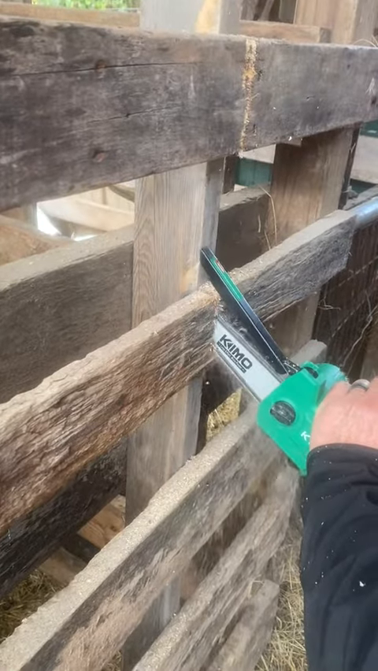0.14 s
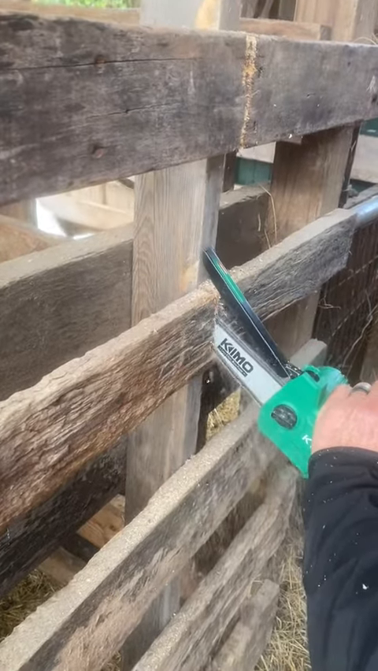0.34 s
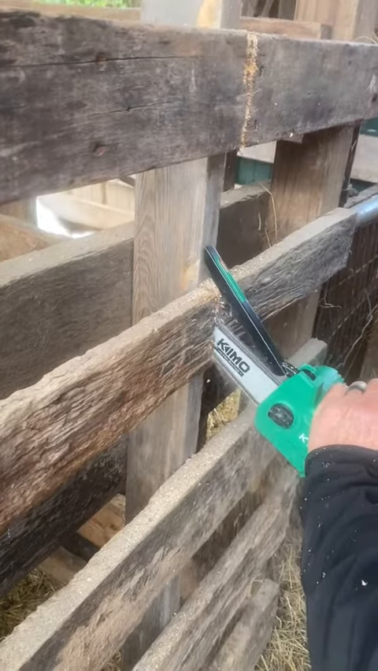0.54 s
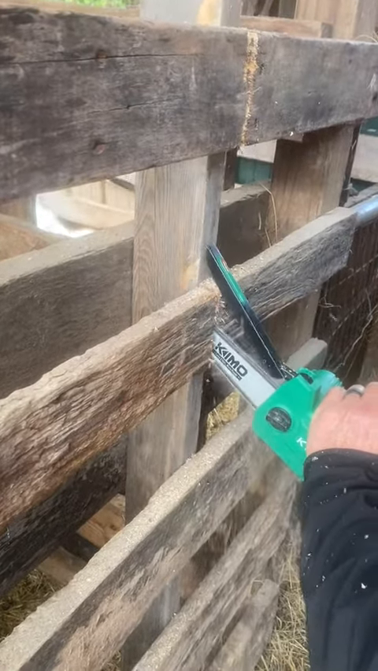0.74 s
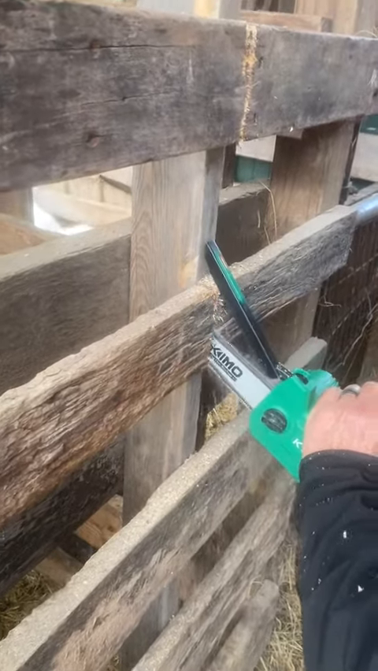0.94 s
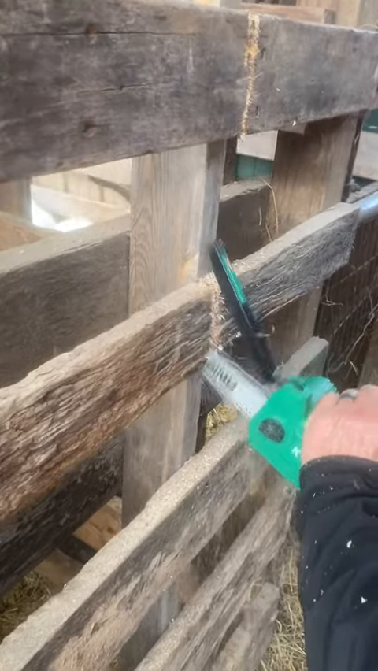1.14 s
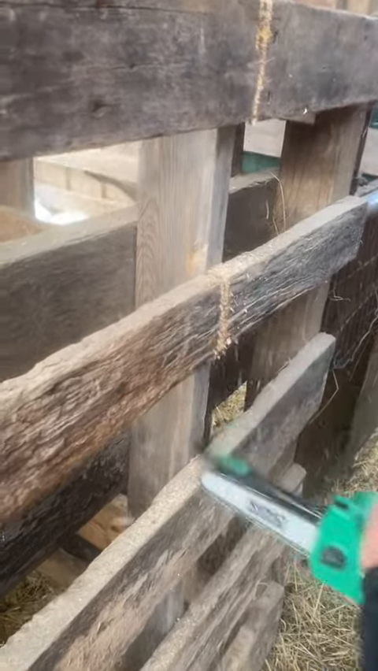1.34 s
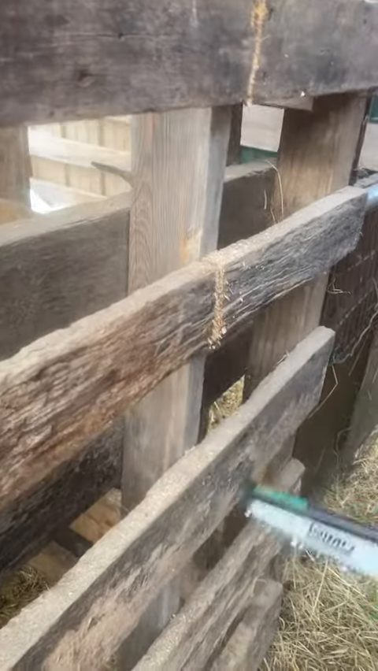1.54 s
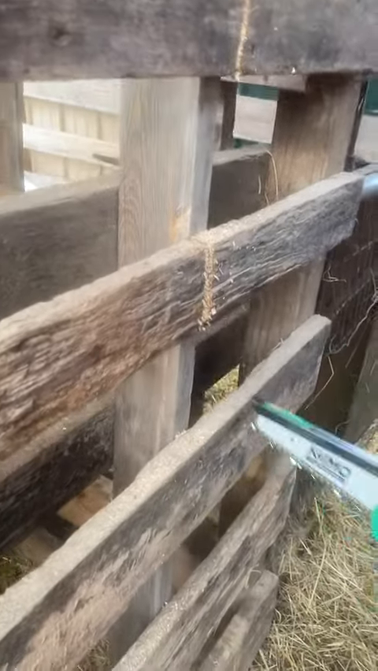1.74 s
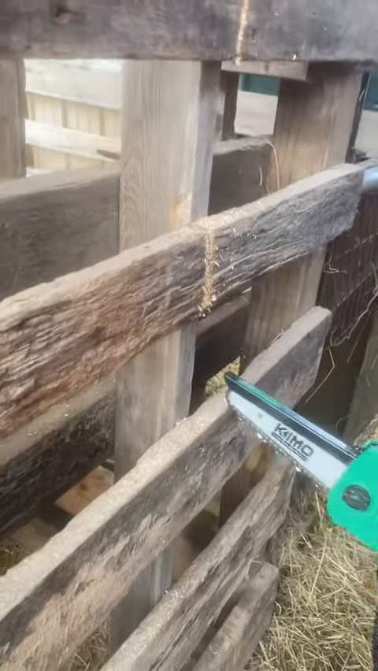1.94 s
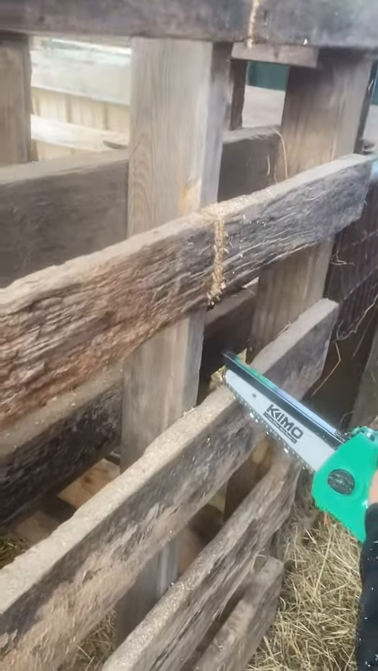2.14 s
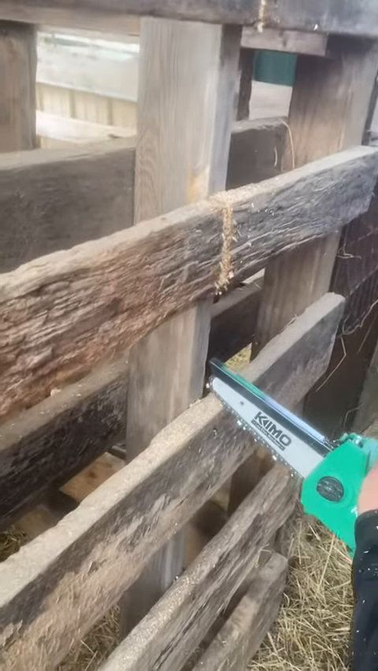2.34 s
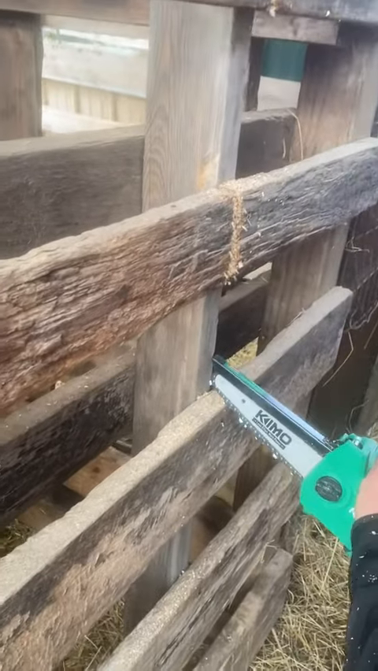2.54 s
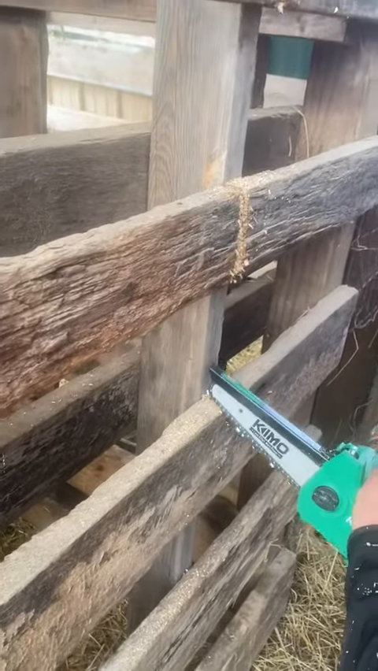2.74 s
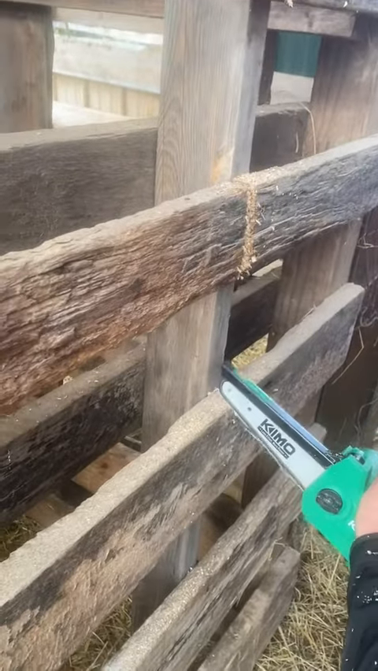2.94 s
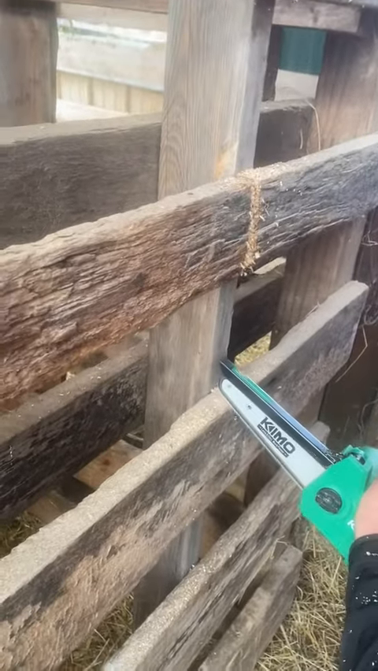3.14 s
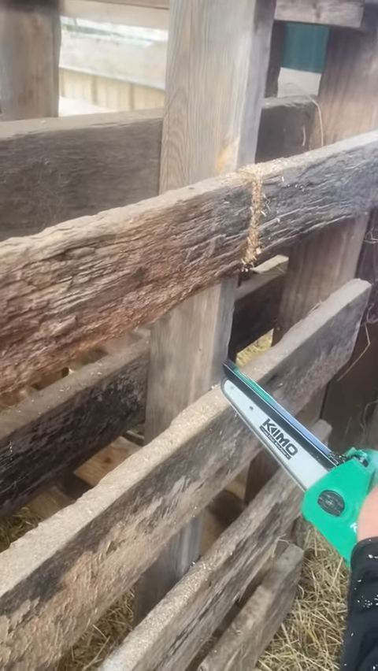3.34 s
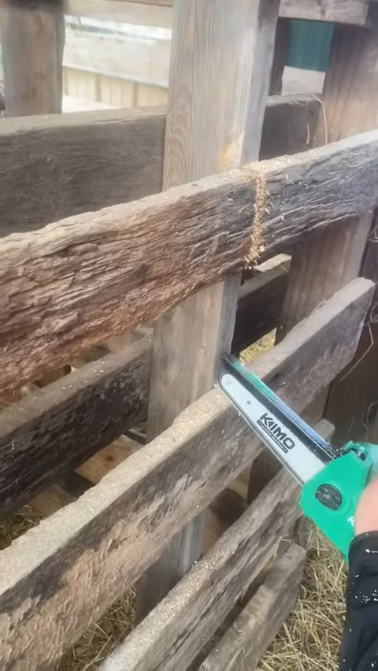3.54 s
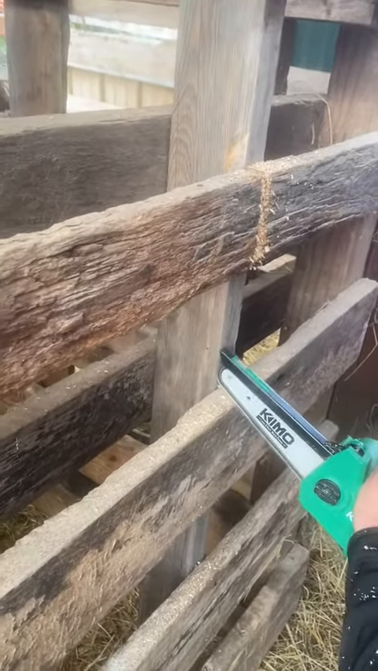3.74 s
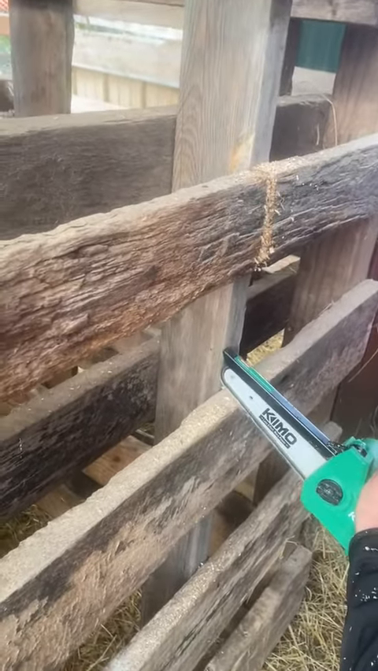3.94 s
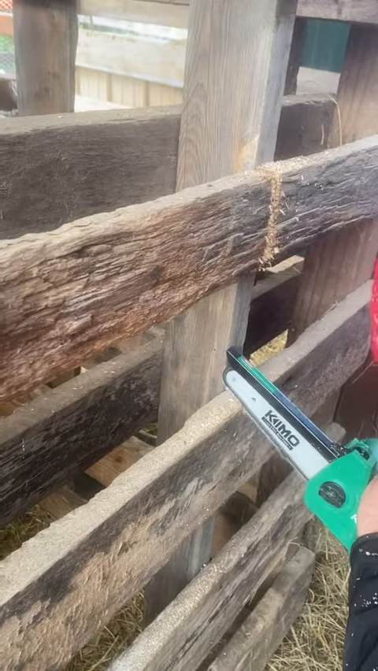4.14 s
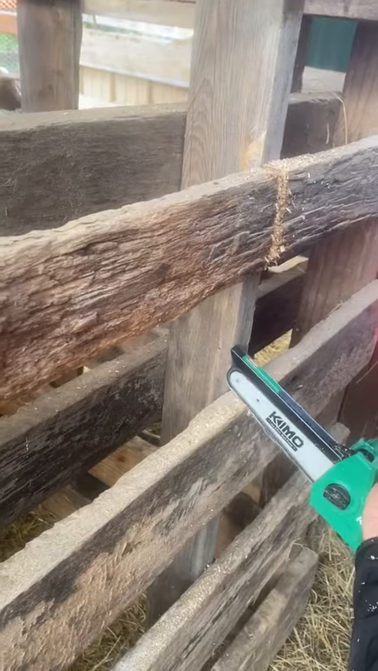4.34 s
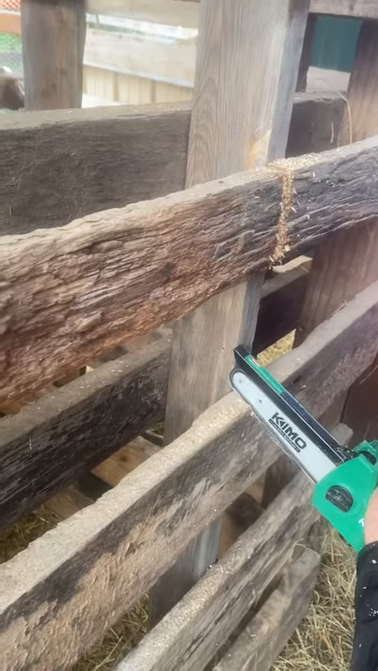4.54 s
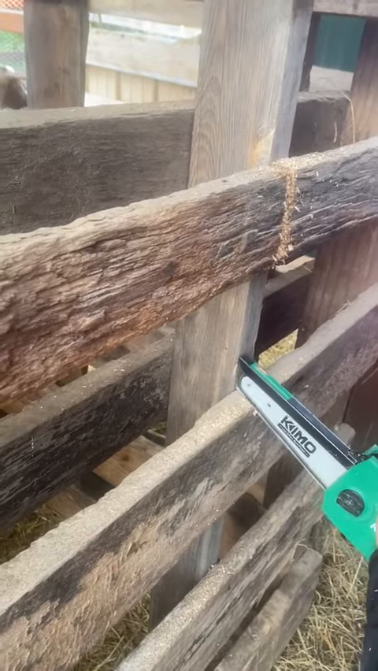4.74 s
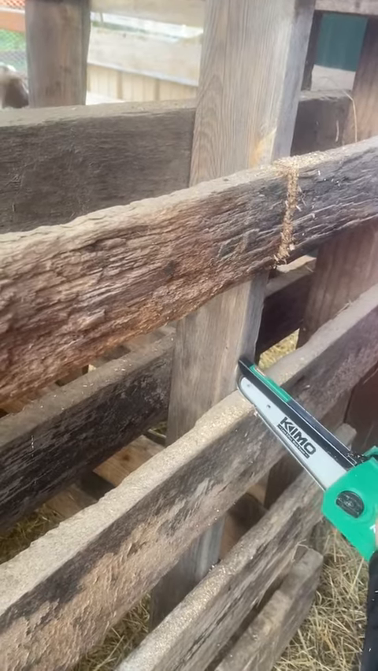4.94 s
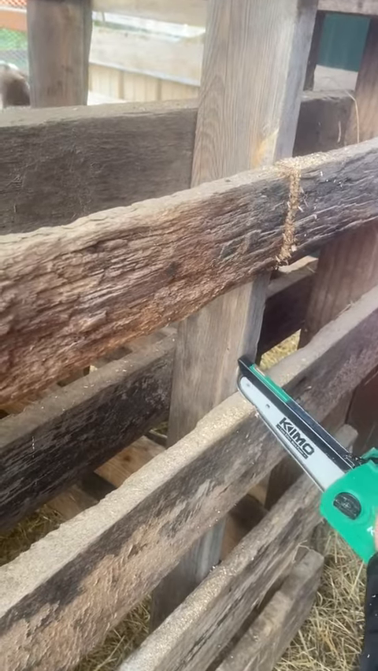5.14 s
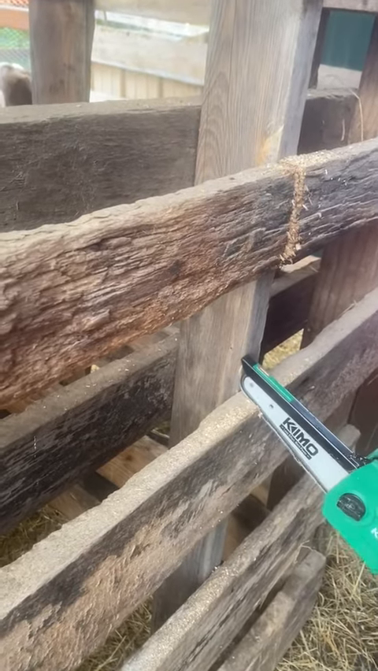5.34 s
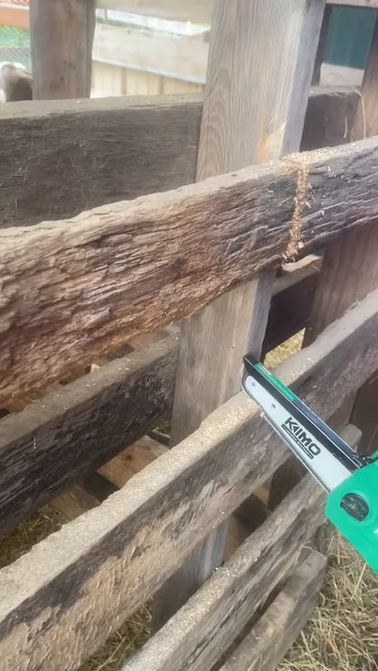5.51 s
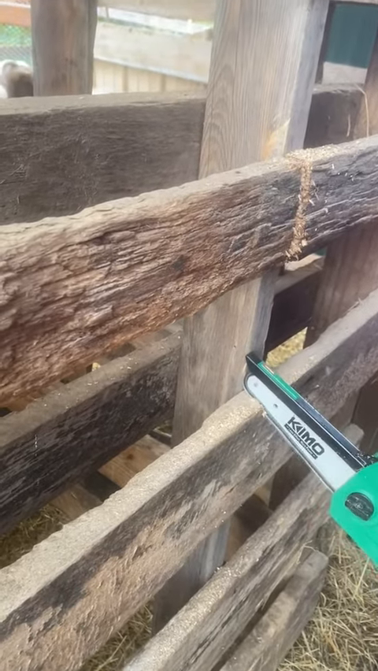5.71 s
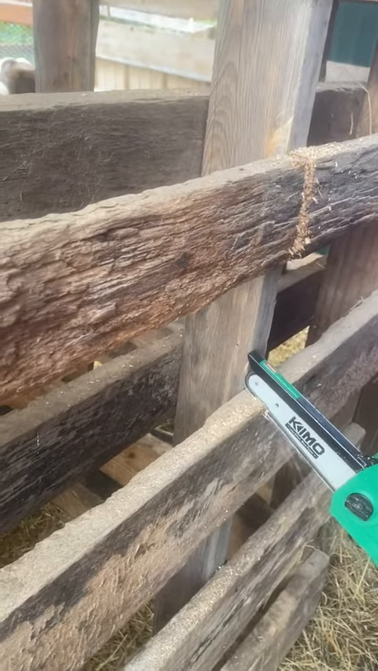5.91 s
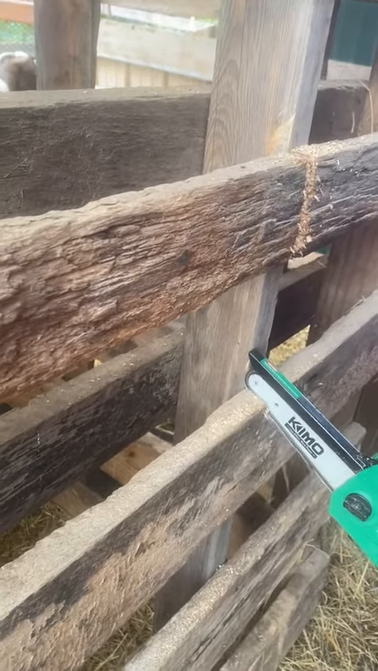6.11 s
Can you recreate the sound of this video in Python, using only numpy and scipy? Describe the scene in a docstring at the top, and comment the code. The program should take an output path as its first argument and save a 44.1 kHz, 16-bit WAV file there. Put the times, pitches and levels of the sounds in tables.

```python
"""Outdoors at a weathered fence, close to two microphone ports: a small battery chainsaw finishes one rail,
runs free, stops, and starts on the rail below. Chain links strike at motor speed and excite the bar;
teeth tear fibres and ring each rail's modes, with catches, snaps, groans and rubs laid on from timed tables.
Filtered noise makes the low rumble, drone, hush and sleeve; a gliding sine makes a faint far call in the pause."""
import sys
import numpy as np
from scipy import signal
from scipy.fft import rfft, irfft, next_fast_len
from scipy.io import wavfile
from scipy.ndimage import uniform_filter1d

SR = 44100
rng = np.random.default_rng(int(sys.argv[2]) if len(sys.argv) > 2 else 0)


def master_out(mix):
    """Clip the mix to full scale and print it as 16-bit PCM to the path in sys.argv[1]."""
    frames = np.transpose(np.atleast_2d(mix))
    ceiling = np.clip(frames, -1, 1)
    pcm = np.round(ceiling * 32767).astype(np.int16)
    wavfile.write(sys.argv[1], SR, pcm)


N = 276507
TIME_S = np.arange(N) / SR
SHARED_PATH = np.array([[1], [0], [0]])  # puts a sound on the path common to both ports

# motor runs: on_s, off_s, free_chain_drive_db
RUNS = [(-.2, 1.484, -34), (2.882, 6.4, -33)]
SPIN_UP_S, COAST_S = .1, .046
LINKS_PER_S = 520  # at full speed, unloaded
LOAD_SAG_SHARE, LOAD_RATTLE_DB = .1, 3  # speed lost and rattle gained at a full bite
# chain spectrum: freq_hz, relative_db_per_hz
CHAIN_SPECTRUM = [(30, -25), (60, -11.5), (200, -5), (400, -9), (900, -1), (1500, 1), (2000, -6),
                  (2800, -1), (4500, 1), (6000, 1.5), (8500, 3), (11500, 1.5), (15800, -2.5)]
# free bar modes: freq_hz, width_hz, relative_db
BAR_MODES = [(841, 16, -5), (1090, 180, -18.5), (1348, 120, -0.5), (1543, 120, -2), (1900, 130, -11.5),
             (2332, 32, -3), (2570, 45, -7.5), (3034, 81, -6.5), (4140, 51, -16.5)]
# bar hops: time_s, rate_hz, relative_depth_db
BAR_HOPS = [(0, 53.95, 1.35), (.6, 50.99, 1.4), (1.101, 50, 1.4), (3.1, 52, 1.2), (3.6, 41.95, 2.0),
            (4.4, 40.05, 1.8), (4.8, 60.05, 1.3), (5.6, 56.95, 1.3), (6.27, 46.74, 1.1)]
# drive note under light load: time_s, level_db (at full speed)
WHINE_LEVEL = [(0, -41.5), (1.3, -49.5), (2.95, -48.5), (3.15, -41.5), (3.4, -50), (4.85, -52),
               (5.05, -32.5), (5.25, -40), (5.42, -36), (5.6, -49), (6.27, -48)]
WHINE_HZ, WHINE_SAG_SHARE, WHINE_WAVER_SHARE = 750, .012, .0027  # free pitch; loss at a full bite; rms waver

# feed into each rail: time_s, level_db (re a full bite)
UPPER_FEED = [(0, -6), (.06, -4.5), (.3, -6.5), (.66, -7), (.98, -3.5), (1.06, -4.5), (1.122, -5),
              (1.152, -17), (1.175, -11), (1.24, -26)]
LOWER_FEED = [(2.975, -18), (2.99, -7), (3.09, -6), (3.16, -20.5), (3.5, -20), (3.6, -6.5), (3.78, -3),
              (4.05, 0), (4.45, -0.83), (4.63, -3), (4.7, -13), (4.96, -22), (5.09, -12.5), (5.66, -8),
              (5.76, -2.5), (5.98, -0.5), (6.27, -1.5)]
# rail modes: freq_hz, width_hz, relative_db
UPPER_RAIL_MODES = [(132, 35, 2.5), (232, 24, 1), (291.7, 19, -2.5), (350, 31, -9), (428, 14, 8),
                    (493, 75, 2), (550, 36, 0.5), (648, 32, -2), (714, 22, 0), (850, 67, 2.5),
                    (995, 16, -0.5)]
LOWER_RAIL_MODES = [(117, 36, -11), (234, 7.6, -10.5), (256.2, 17, 1), (349.4, 22, -3), (499, 15, 2.5),
                    (536, 27, -2.5), (650, 22, 5), (730, 28, 5.5), (795, 20, 1), (846.7, 11, 7),
                    (977, 10, -10)]
# modes of the bar gripped in each kerf: freq_hz, width_hz, relative_db
UPPER_KERF_MODES = [(1008, 44, 3.5), (1189, 55, 1.5), (1290, 140, 6.5), (1460, 110, -6.5), (1653, 80, 0.5),
                    (2040, 120, -4), (3298, 170, 1.5), (4010, 83, -14)]
LOWER_KERF_MODES = [(1340, 130, 3.4), (1562, 110, 3.1), (2128, 110, 8.9), (2320, 31, 6), (2547, 51, 5.3),
                    (4020, 130, 4.6)]
# spectrum of tearing fibres: freq_hz, relative_db_per_hz
TEAR_SPECTRUM = [(30, -25), (300, -14.5), (900, 3), (1350, 0.5), (2100, 0), (2800, -0.5), (3500, -3.5),
                 (4700, -2), (6000, -13.5), (10000, -12.5), (16000, -21.5)]
# dB per dB of feed: whole rasp, bar ring relative to tearing, low shudder
TEAR_LAW, GRIP_LAW, SHUDDER_LAW = .24, .63, .68

# the upper rail parts: time_s, pitch_hz, t60_s, initial_db
PARTING = (1.145, 125, .17, -17.5)
PARTING_S = PARTING[0]
# modes of the nearly severed rail: freq_hz, width_hz, relative_db
LOOSE_RAIL_MODES = [(133, 75, -5), (233, 120, -5), (272, 25, 4.5)]
# yield before parting; changes reached at parting: open kerf frees the bar, fibres rip, shudder drops
YIELD_S, YIELD_GRIP_DB, YIELD_TEAR_DB, YIELD_SHUDDER_DB = .44, -18.5, 10.5, -11
FLAP_DB, FLAP_GROWTH_DB_PER_S, FLAP_FADE_DB_PER_S = -25.5, 49, 127.5
# yielding rail beats on the teeth: rate at parting, its fall until then, depth at parting
GROWL_HZ, GROWL_SAG_HZ_PER_S, GROWL_DB = 135.4, 55, 2

# caught teeth: start_s, nominal_knock_peak_db, nominal_rasp_peak_db
KNOCKS = [(.033, -14, -13.5), (.764, -19, -17), (.783, -11, -14), (1.097, -16, -12), (1.113, -16, -15),
          (1.141, -18, -14), (1.319, -15, -17), (2.975, -5.5, -11), (3.001, -10.5, -15),
          (3.037, -11.5, -17.5), (3.061, -8, -22), (3.083, -13, -23), (3.314, -14, -16), (3.37, -11.5, -17),
          (3.509, -12, -15), (3.553, -8.5, -10.5), (3.61, -18.5, -16.5), (3.754, -13.5, -10),
          (3.774, -18, -18), (3.798, -13, -19), (3.836, -12, -15), (3.927, -17, -10), (3.975, -9.5, -21),
          (4.022, -11.5, -14.5), (4.07, -10, -17), (4.085, -6, -11), (4.149, -15, -25), (4.209, -10, -16),
          (4.385, -8.5, -17), (4.47, -18, -12), (5.738, -9, -17), (5.933, -9.5, -25.5),
          (5.968, -11.5, -21.5), (6.049, -15, -20), (6.089, -15, -15.5), (6.121, -9, -14.5)]
# snaps of splinters and links: start_s, nominal_peak_db
SNAPS = [(.078, -10.5), (.143, -12), (1.07, -14), (1.1205, -10), (1.1595, -10), (1.1624, -2), (1.163, -4),
         (1.174, -13), (1.206, -16), (1.3699, -17), (2.9246, -30), (3.6265, -15.5), (3.645, -16),
         (3.7238, -10.5), (3.8493, -15), (3.906, -12.5), (3.953, -12), (4.4691, -14), (4.5175, -15.5),
         (4.833, -14.5), (4.9046, -14.5), (5.001, -17.5), (5.05, -15.5), (5.248, -11.5), (5.375, -13)]
SPLINTERS_PER_S, SPLINTER_DB = 5, -24.5  # random small snaps: rate at a full bite, nominal peak
# spectra of a snap and of a tooth's blunt blow: freq_hz, relative_db_per_hz
CRACK_SPECTRUM = [(30, -25.5), (300, -13.5), (900, -1.5), (1800, 2), (2700, -1.5), (3500, -2), (5000, 2),
                  (6200, -9.5), (10000, -7), (16000, -19.5)]
BLOW_SPECTRUM = [(60, -10.5), (300, -5), (800, 4), (2000, -0.5), (4000, -11.5), (10000, -17)]
# teeth lock onto one rail mode: loudest_s, half_length_s, pitch_hz, level_db
GROANS = [(.69, 0.086, 1295, -24.5), (.885, 0.074, 835, -29), (.975, 0.092, 850, -21.5),
          (1.018, 0.078, 428, -22.5), (1.101, 0.11, 276, -23.5), (6.232, .1, 265, -31.5)]
GROAN_SAG_PER_S, GROAN_ROUGHNESS = .45, .26  # share of pitch lost per s; rms unevenness
# bar side rubs in the fresh kerf: loudest_s, half_length_s, level_db
RUBS = [(4.464, 0.035, -30), (4.52, 0.033, -26), (5.196, .04, -29.5), (5.36, .03, -32),
        (5.635, 0.091, -30.5), (5.665, 0.038, -29), (5.764, .05, -32), (6.029, .06, -31.5),
        (6.177, 0.054, -32), (6.222, 0.084, -23.5)]
# rub modes, applied twice: freq_hz, width_hz, relative_db (per pass)
RUB_MODES = [(2327, 230, -3), (2550, 240, -4)]

# ticks of housing and trigger: start_s, freq_hz, peak_db, decay_s
TICKS = [(1.571, 1800, -35, .005), (1.571, 5030, -42, .005), (1.77, 4140, -54, .005),
         (1.772, 2510, -55, .005), (2.862, 5290, -46, .003), (2.875, 950, -51, 0.0053)]
# sleeve rustle: time_s, level_db
SLEEVE_LEVEL = [(1.5, -45), (1.72, -70), (1.85, -69), (2.1, -70), (2.28, -87), (2.78, -87), (2.865, -68),
                (2.92, -68)]
# sleeve spectrum: freq_hz, relative_db_per_hz
SLEEVE_SPECTRUM = [(100, -13.5), (400, -1), (900, -3), (2000, -7.5), (4000, -16), (6000, -19), (11000, -26),
                   (16000, -31.5)]

# rumble of air and handling: time_s, level_db
RUMBLE_LEVEL = [(0, -46), (1.45, -44.5), (2.1, -52), (2.78, -64), (2.86, -57), (3.0, -59), (3.9, -60),
                (4.5, -47.5), (6.27, -56)]
# rumble and shudder spectrum: freq_hz, relative_db_per_hz
AIR_SPECTRUM = [(20, -30), (30, -22), (44, 1.5), (80, -4), (120, -0.5), (170, -5.5), (265, -15), (420, -25),
                (1000, -42), (2000, -82)]
# drone bands, applied twice: freq_hz, width_hz, relative_db (per pass)
DRONE_BANDS = [(134.6, 9, -1), (178, 30, -11), (238, 25, -10), (278, 25, -9.5), (330, 150, -14),
               (428, 26, -14.5)]
DRONE_DB, DRONE_RISE_S, DRONE_FADE_DB_PER_S = -30, .23, 30  # rise and fade both start at parting
# open-air hush: time_s, level_db
HUSH_LEVEL = [(0, -62.5), (2.1, -70), (2.3, -72.5), (2.75, -73), (2.9, -68), (6.27, -58)]
# hush spectrum: freq_hz, relative_db_per_hz
FIELD_SPECTRUM = [(30, -14.5), (150, -8), (320, -7), (560, -3.5), (720, -11), (900, -15), (2000, -15),
                  (4000, -20), (7000, -18.5), (12000, -26.5), (16000, -29)]
# faint far call: time_s, pitch_hz, level_db
CALL = [(2.331, 500, -89), (2.36, 488, -59), (2.4, 480, -67), (2.42, 420, -68), (2.5, 430, -68),
        (2.57, 434, -70), (2.68, 428, -80.5)]

# echoes off post and rails: delay_s
ECHO_DELAYS_S = [.0023, .0041, .0067, .0103, .0149]
# phase by which the left port leads: freq_hz, lead_rad
PORT_LEAD = [(200, 0), (330, .08), (680, 1.0), (1600, .15), (2750, 2.0), (3700, .4), (4300, 1.0), (5350, 0),
             (6500, np.pi), (8000, np.pi), (10200, 7.0), (11550, 6.3), (12750, 9.35), (14300, 9.5),
             (15800, 12.3)]
# likeness of the ports: freq_hz, alike_0_to_1
PORT_LIKENESS = [(100, .999), (250, 0.99), (700, 0.7), (1500, 0.58), (3000, 0.62), (5200, 0.6),
                 (5950, 0.54), (6550, 1), (7950, 1), (8500, 0.81), (10400, 0.25), (11400, 1), (12300, 0.45),
                 (13600, 0.94), (15500, .55)]
# port balance: freq_hz, left_minus_right_db
PORT_BALANCE = [(200, 0), (400, -.7), (750, 5.5), (1400, 3.7), (2100, -.5), (2500, -2), (3100, 1),
                (4300, -1.5), (5300, 0)]
EDGE_HZ = 15950


def chain(chatter_db, speed_law=1.7):
    """Links slap the sprocket and slide in the groove; the steel bar and the housing ring."""
    links = strikes(LINKS_PER_S, jitter=.25, spread_db=2.5) * gain_of(1.3 * chatter_db)
    rattle = sum(gain_of(db) * spin(on_s, off_s) ** speed_law for on_s, off_s, db in RUNS)
    rattle = rattle * gain_of(LOAD_RATTLE_DB * load())
    drive = evened(scrape(links, decay_s=.0009) + .25 * evened(links)) * rattle
    return gain_of(5.5) * boards(colour(drive, CHAIN_SPECTRUM)) + gain_of(13.5) * ring(drive, BAR_MODES)


def whine():
    """The note of the drive follows the motor as it runs up, labours and coasts down."""
    speed = sum(spin(on_s, off_s) for on_s, off_s, _ in RUNS)
    pitch_hz = WHINE_HZ * speed * (1 - WHINE_SAG_SHARE * load()) * (1 + WHINE_WAVER_SHARE * wobble(0, 12))
    tone = np.sqrt(2) * np.sin(2 * np.pi * np.cumsum(pitch_hz) / SR)
    return SHARED_PATH * level(WHINE_LEVEL) * speed ** 2 * tone


def upper_cut(chatter_db, tear_db=-29.0, bar_db=8.0, shudder_db=-40.5):
    """The end of a deep cut: the kerf grips the bar until the rail yields."""
    yielded = np.interp(TIME_S, [PARTING_S - YIELD_S, PARTING_S, UPPER_FEED[-1][0]], [0, 1, 0])
    growl_hz = GROWL_HZ + GROWL_SAG_HZ_PER_S * np.maximum(PARTING_S - TIME_S, 0)
    growl = jerks(growl_hz, jitter=.04, fall_turns=.4)
    sway_db = chatter_db + GROWL_DB * np.sqrt(yielded) * growl
    return cut(UPPER_FEED, UPPER_RAIL_MODES, UPPER_KERF_MODES, sway_db, spread_db=.5, push_db=-20.0,
               tear_db=tear_db + YIELD_TEAR_DB * yielded, bar_db=bar_db + YIELD_GRIP_DB * yielded,
               shudder_db=shudder_db + YIELD_SHUDDER_DB * yielded)


def lower_cut(chatter_db, tear_db=-34.5, tear_db_per_s=3.0, shudder_db=-49, shudder_db_per_s=2.0):
    """A fresh cut: as the kerf deepens, more teeth tear at once and the fence shudders more."""
    cutting_s = np.maximum(TIME_S - LOWER_FEED[0][0], 0)
    return cut(LOWER_FEED, LOWER_RAIL_MODES, LOWER_KERF_MODES, 1.15 * chatter_db, spread_db=1.5,
               push_db=-24.0, tear_db=tear_db + tear_db_per_s * cutting_s, bar_db=-2.0,
               shudder_db=shudder_db + shudder_db_per_s * cutting_s)


def cut(feed, rail, kerf, sway_db, spread_db, push_db, tear_db, bar_db, shudder_db):
    """Cutters, on every second link, tear the fibres, ring the bar and shake the rail, following the feed."""
    teeth = strikes(LINKS_PER_S / 2, jitter=.28, spread_db=spread_db)
    bites = evened((scrape(teeth, decay_s=.0022) + .2 * evened(teeth)) * gain_of(sway_db))
    force = np.maximum(level(feed), 0)
    wood = wandering(bites, rail, swell_db=1.2, rate_hz=9)
    wood = evened(wood * gain_of(.25 * sway_db)) * force
    bar = wandering(bites, kerf, swell_db=3.2, rate_hz=15)
    rasp = boards(colour(bites, TEAR_SPECTRUM)) + gain_of(bar_db) * force ** GRIP_LAW * bar
    rasp = evened(rasp) * force ** TEAR_LAW
    shudder = evened(colour(hiss(), AIR_SPECTRUM)) * force ** SHUDDER_LAW
    return gain_of(push_db) * wood + gain_of(tear_db) * rasp + gain_of(shudder_db) * shudder


def rubs(chatter_db):
    """The bar leans on the wall of the kerf and its high modes flare."""
    pressure = sum(gain_of(db) * swell(s, half_s) for s, half_s, db in RUBS)
    return evened(ring(ring(hiss(), RUB_MODES), RUB_MODES)) * pressure * gain_of(chatter_db)


def giving_way():
    """Held by its last fibres, the upper rail flaps ever harder in its lowest modes, then thumps as it parts."""
    s, pitch_hz, t60_s, db = PARTING
    tugs = scrape(strikes(LINKS_PER_S / 2, jitter=.33, spread_db=5.0), decay_s=.0039)
    flap_db = FLAP_DB - np.maximum(FLAP_GROWTH_DB_PER_S * (s - TIME_S), FLAP_FADE_DB_PER_S * (TIME_S - s))
    out = evened(ring(tugs, LOOSE_RAIL_MODES)) * gain_of(flap_db)
    t_s = np.arange(SR // 3) / SR
    thump = gain_of(db - 60 * t_s / t60_s) * np.sin(2 * np.pi * pitch_hz * t_s)
    add(out, s, SHARED_PATH * thump)
    return out


def groans():
    """Teeth locked onto one rail mode give short, rough, falling tones."""
    grain = 1 + GROAN_ROUGHNESS * wobble(0, 70)
    out = np.zeros(N)
    for s, half_s, pitch_hz, db in GROANS:
        near = abs(TIME_S - s) < half_s
        t_s = TIME_S[near] - s
        turns = pitch_hz * (t_s - GROAN_SAG_PER_S * t_s ** 2 / 2) + rng.random()
        envelope = (swell(s, half_s) * grain)[near]
        out[near] += gain_of(db) * envelope * np.sqrt(2) * np.sin(2 * np.pi * turns)
    return SHARED_PATH * out


def catches(crest_db=12.5, dig_s=.003, drag_s=.006, rasp_rise_s=.002, rasp_s=.005, rasp_crack_db=-25,
            crack_s=.0032, crack_crest_db=8.5):
    """A catching tooth rasps against the bar, drags on the rail and rings it; snaps are short, bright cracks."""
    out = np.zeros((3, N))
    for s, knock_db, rasp_db in KNOCKS:
        upper = s < PARTING_S
        rail, kerf = (UPPER_RAIL_MODES, UPPER_KERF_MODES) if upper else (LOWER_RAIL_MODES, LOWER_KERF_MODES)
        knock = ring(colour(drag(dig_s, drag_s), BLOW_SPECTRUM), rail)
        grit = drag(rasp_rise_s, rasp_s)
        rasp = ring(grit, kerf) + gain_of(rasp_crack_db) * colour(grit, CRACK_SPECTRUM)
        knock = opening_at(knock, knock_db - crest_db, size=SR // 50)
        rasp = opening_at(rasp, rasp_db - crest_db, size=SR // 100)
        add(out, s, knock + rasp)
    splinter_times_s = TIME_S[rng.random(N) < SPLINTERS_PER_S * load() / SR]
    splinters = [(s, SPLINTER_DB) for s in splinter_times_s]
    for s, db in SNAPS + splinters:
        snap = colour(burst(decay_s=crack_s, grit=.86), CRACK_SPECTRUM)
        add(out, s, opening_at(snap, db - crack_crest_db, size=SR // 300))
    return out


def handling(tick_width_hz=1300):
    """The sleeve rustles as the saw moves down and the trigger is squeezed; plastic ticks in the hand."""
    out = evened(colour(hiss(), SLEEVE_SPECTRUM)) * level(SLEEVE_LEVEL)
    for s, freq_hz, db, decay_s in TICKS:
        mode = [(freq_hz, tick_width_hz, 0)]
        tick = ring(ring(burst(decay_s=decay_s, grit=.55), mode), mode)
        add(out, s, gain_of(db) * tick / abs(tick).max(axis=1, keepdims=True))
    return out


def outdoors():
    """Noise bands make low rumble, a fading drone and a soft hush; a gliding sine makes one faint far call."""
    rumble = evened(colour(hiss(), AIR_SPECTRUM)) * level(RUMBLE_LEVEL)
    since_s = np.maximum(TIME_S - PARTING_S, 0)
    fade = np.minimum(since_s / DRONE_RISE_S, 1) * gain_of(DRONE_DB - DRONE_FADE_DB_PER_S * since_s)
    drone = evened(ring(ring(hiss(), DRONE_BANDS), DRONE_BANDS)) * fade
    hush = evened(colour(hiss(), FIELD_SPECTRUM)) * level(HUSH_LEVEL)
    s, hz, _ = np.transpose(CALL)
    pitch_hz = np.interp(TIME_S, s, hz) * (1 + .0074 * wobble(0, 30))
    call = np.sin(2 * np.pi * np.cumsum(pitch_hz) / SR) * level(CALL, index=2)
    return rumble + drone + hush + call  # the call lands on all three paths


def spin(on_s, off_s):
    """Share of full speed: the motor runs up evenly and coasts down when let go."""
    run_up = np.clip((TIME_S - on_s) / SPIN_UP_S, 0, 1)
    return run_up * np.exp(-np.maximum(TIME_S - off_s, 0) / COAST_S)


def load():
    """Load on the motor, 1 at a full bite."""
    return level(UPPER_FEED) + level(LOWER_FEED)


def strikes(per_s, jitter, spread_db):
    """One click of uneven size for each passing link or tooth."""
    speed = sum(spin(on_s, off_s) for on_s, off_s, _ in RUNS) * (1 - LOAD_SAG_SHARE * load())
    passed = np.floor(np.cumsum(per_s * speed * (1 + jitter * wobble(0, 150))) / SR)
    size_db = spread_db * np.clip(rng.standard_normal(N), -2, 2)
    return (np.diff(passed, prepend=0) > 0) * gain_of(size_db)


def scrape(clicks, decay_s):
    """Each click drags on as a short burst of grit."""
    power = signal.lfilter([1], [1, -np.exp(-1 / (SR * decay_s))], clicks ** 2)
    return evened(np.sqrt(power) * hiss())


def drag(rise_s, decay_s):
    """The force of a tooth that digs in and drags free."""
    t_s = np.arange(SR // 5) / SR
    return np.minimum(t_s / rise_s, 1) * np.exp(-t_s / decay_s) * hiss(size=len(t_s))


def burst(decay_s, grit):
    """A blow followed by dying grit."""
    t_s = np.arange(SR // 5) / SR
    return (t_s == 0) + grit * np.exp(-t_s / decay_s) * hiss(size=len(t_s))


def wandering(x, modes, swell_db, rate_hz):
    """The contact wanders in the kerf, so each mode swells on its own."""
    return sum(ring(x, [mode]) * gain_of(swell_db * wobble(0, rate_hz)) for mode in modes)


def ring(x, modes):
    """A bank of resonances."""
    out = 0
    for freq_hz, width_hz, db in modes:
        b, a = signal.iirpeak(freq_hz, freq_hz / abs(width_hz), SR)
        out = out + gain_of(db) * signal.lfilter(b, a, x)
    return out


def boards(x, echo_db=-7.5, drift_s=.00018):
    """Short echoes off the fence; as the hand sways their delays drift, so bands of colour wander."""
    out = x.copy()
    for delay_s in ECHO_DELAYS_S:
        heard_at_s = TIME_S - delay_s - drift_s * wobble(0, .5)
        out += gain_of(echo_db) * np.array([np.interp(heard_at_s, TIME_S, path) for path in x])
    return out / np.sqrt(1 + len(ECHO_DELAYS_S) * gain_of(echo_db) ** 2)


def jerks(rate_hz, jitter, fall_turns, rise_turns=.16):
    """An uneven run of jolts, each a quick rise and a slower fall; rms 1."""
    turn = np.cumsum(rate_hz * (1 + jitter * wobble(0, 25))) / SR % 1
    jolt = np.minimum(turn / rise_turns, 1) * np.exp(-turn / fall_turns)
    return evened(jolt - jolt.mean())


def wobble(hz, width_hz):
    """Random swing in a band about hz, rms 1."""
    size, step = 2 ** 14, 32  # drawn at a coarse rate, then interpolated
    f_hz = np.fft.rfftfreq(size, step / SR)
    swing = irfft(rfft(rng.standard_normal(size)) * np.exp(-.5 * ((f_hz - hz) / width_hz) ** 2))
    return evened(np.interp(TIME_S, np.arange(size) * step / SR, swing))


def swell(s, half_s):
    """A smooth bump of height 1 about time s."""
    knots_s = s + half_s * np.array([-1, -.25, 0, .25, 1])
    return np.interp(TIME_S, knots_s, [0, .8, 1, .8, 0]) ** 2


def hiss(size=N):
    """Noise on three paths: one heard at both ports, then one for each port alone."""
    return rng.standard_normal((3, size))


def colour(x, spectrum):
    """Causal minimum-phase filter with the given spectrum."""
    log_gain = np.log(gain_of(read(spectrum, abs(np.fft.fftfreq(8192, 1 / SR)))))
    taps = np.fft.ifft(np.exp(np.conj(signal.hilbert(log_gain)))).real
    return signal.oaconvolve(x, taps[None], axes=1)[:, :x.shape[1]]


def read(points, hz):
    """Reads a spectrum on a log-frequency axis."""
    f_hz, value = np.transpose(points)
    return np.interp(np.log(hz + 1), np.log(np.sort(abs(f_hz)) + 1), value)


def level(rows, index=1):
    """A dB column as a gain over time, silent outside its span."""
    rows = np.array(rows)
    s = rows[:, 0]
    inside = 1. * ((TIME_S > s[0] - .01) & (TIME_S < s[-1] + .01))
    return gain_of(np.interp(TIME_S, s, rows[:, index])) * uniform_filter1d(inside, size=400)


def opening_at(sound, db, size):
    """Scales a blow so that its first size samples have an rms of db."""
    return gain_of(db) * sound / sound[:, :size].std(axis=1, keepdims=True)


def evened(x):
    """Scales to rms 1."""
    return x / np.sqrt(np.mean(x ** 2) + 1e-20)


def gain_of(db):
    """Decibels to gain."""
    return np.exp(np.asarray(db) * (np.log(10) / 20))


def add(mix, s, sound):
    """Mixes a sound in at time s."""
    part = mix[:, max(round(s * SR), 0):][:, :sound.shape[1]]
    part += sound[:, :part.shape[1]]


def ports(paths):
    """Shared sound reaches the two ports out of step; sound scattered by the boards makes them less alike."""
    size = next_fast_len(N)
    hz = np.fft.rfftfreq(size, 1 / SR)
    side = np.array([[.5], [-.5]])  # left, right
    alike = np.clip(read(PORT_LIKENESS, hz), 0, 1)
    spectra = rfft(paths, size)
    heard = np.sqrt(alike) * spectra[0] + np.sqrt(1 - alike) * spectra[1:]
    lead = np.exp(1j * side * read(PORT_LEAD, hz))
    balance = gain_of(side * read(PORT_BALANCE, hz))
    return irfft(heard * lead * balance, size)[:, :N]


def scene():
    """The slack chain whips and the bar hops in the kerf, jolting rattle and bite together."""
    s, rate_hz, depth_db = np.transpose(BAR_HOPS)
    hop_hz = np.interp(TIME_S, s, rate_hz)
    hops_db = np.interp(TIME_S, s, depth_db) * jerks(hop_hz, jitter=.13, fall_turns=.4)
    whip_db = .31 * wobble(7, 3.5) + .33 * wobble(21, 9.2) + .4 * wobble(45, 14)
    chatter_db = whip_db + hops_db
    saw = chain(.5 * chatter_db) + whine() + upper_cut(chatter_db) + lower_cut(chatter_db) + rubs(chatter_db)
    return ports(saw + giving_way() + groans() + catches() + handling() + outdoors())


def record(dry):
    """Low-pass at EDGE_HZ."""
    taps = signal.firwin(701, EDGE_HZ, window=("kaiser", 9), fs=SR)
    return signal.oaconvolve(dry, taps[None], "same")


dry = scene()
out = record(dry)
master_out(out)
```